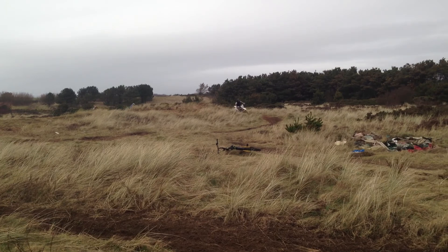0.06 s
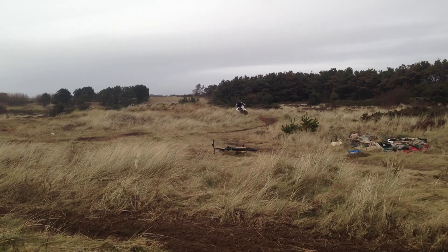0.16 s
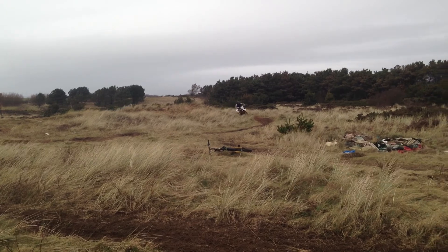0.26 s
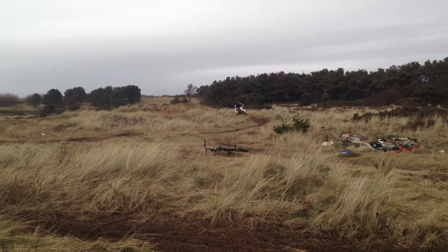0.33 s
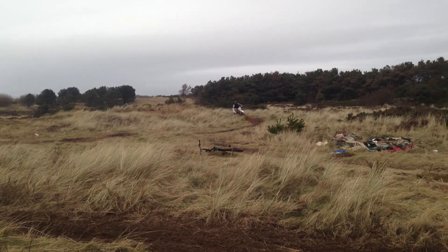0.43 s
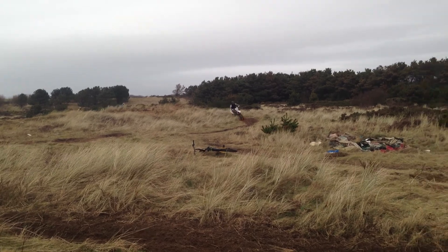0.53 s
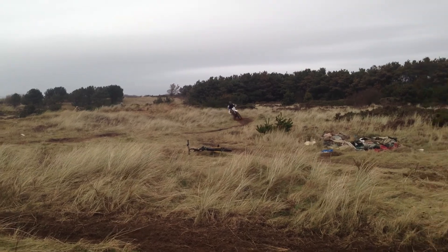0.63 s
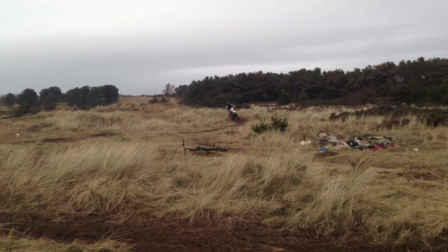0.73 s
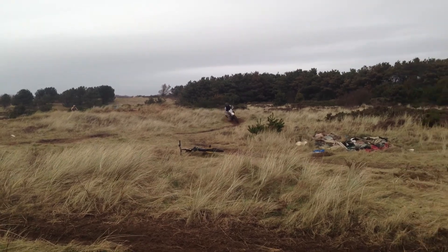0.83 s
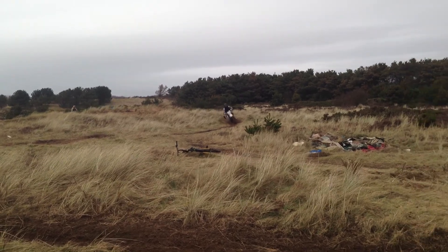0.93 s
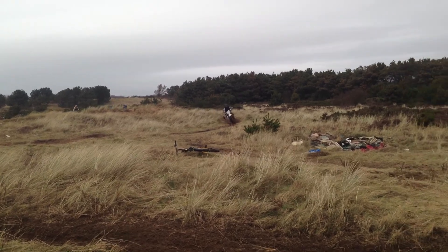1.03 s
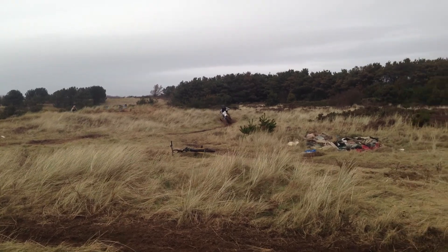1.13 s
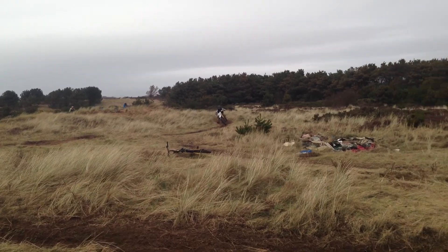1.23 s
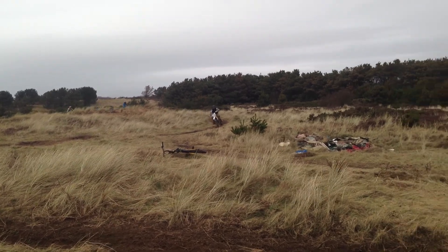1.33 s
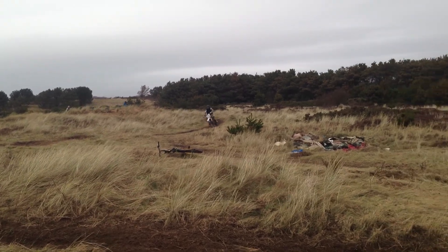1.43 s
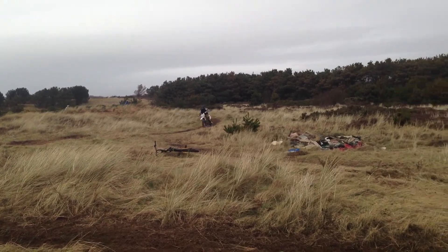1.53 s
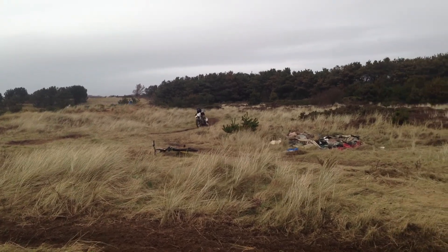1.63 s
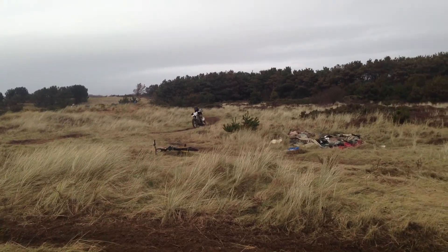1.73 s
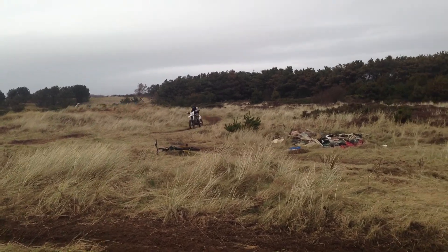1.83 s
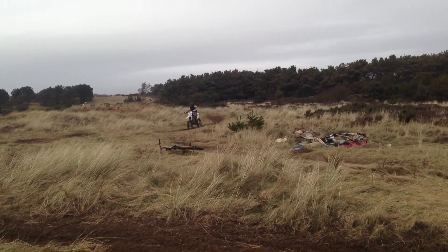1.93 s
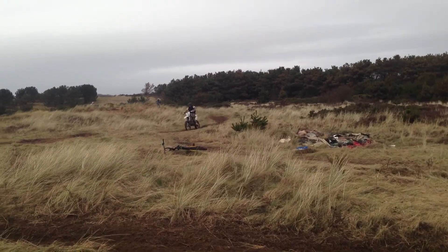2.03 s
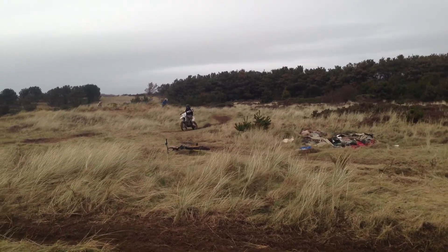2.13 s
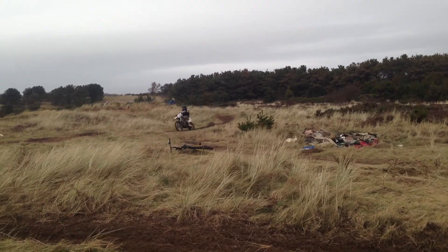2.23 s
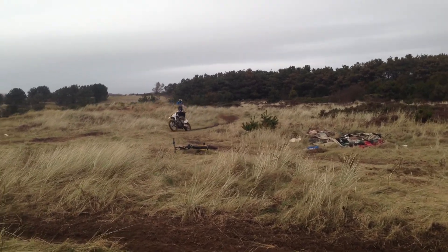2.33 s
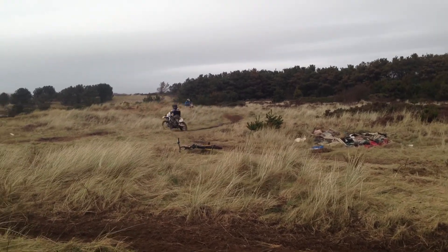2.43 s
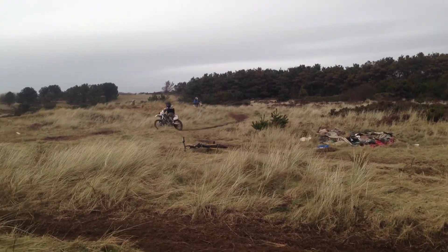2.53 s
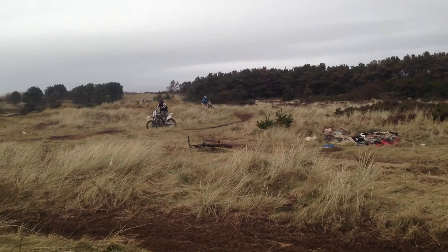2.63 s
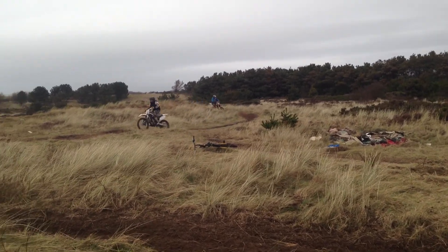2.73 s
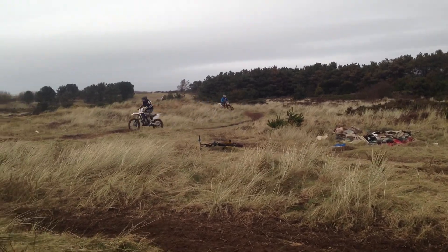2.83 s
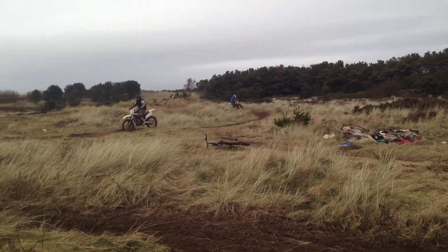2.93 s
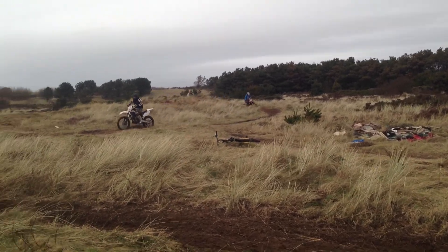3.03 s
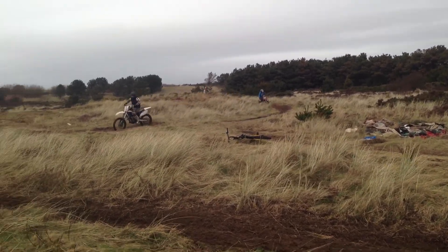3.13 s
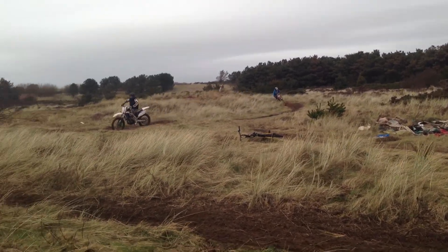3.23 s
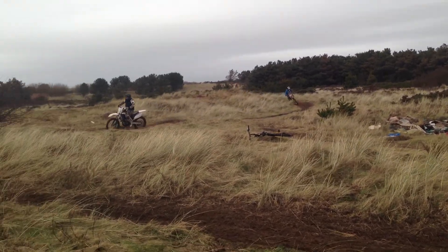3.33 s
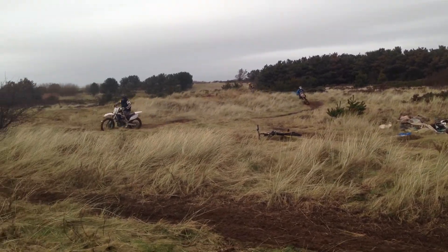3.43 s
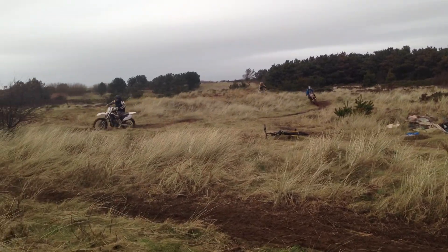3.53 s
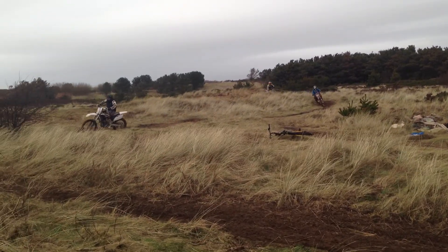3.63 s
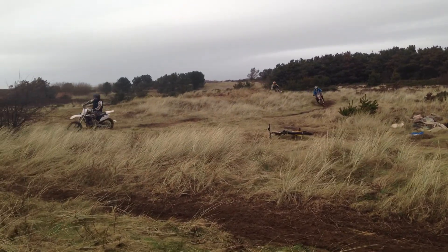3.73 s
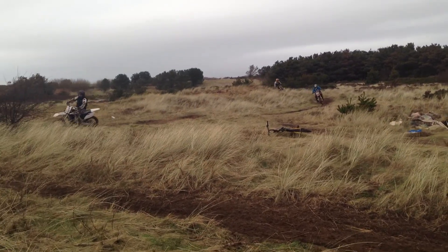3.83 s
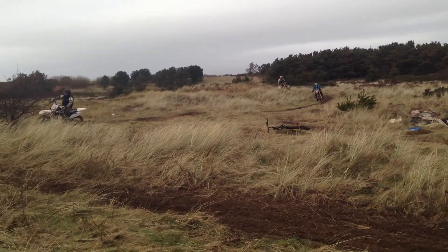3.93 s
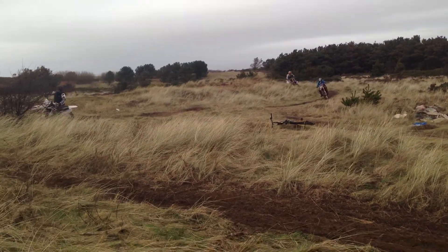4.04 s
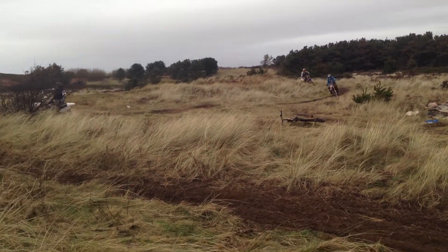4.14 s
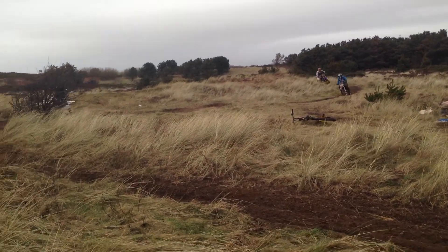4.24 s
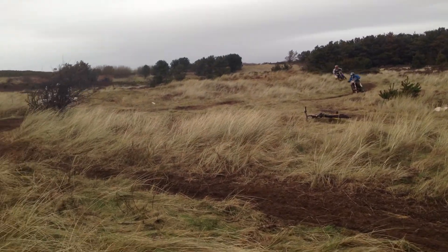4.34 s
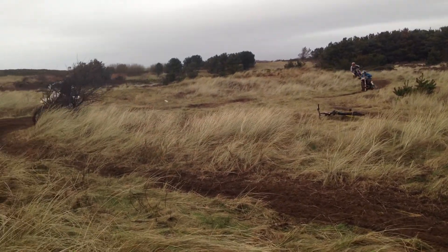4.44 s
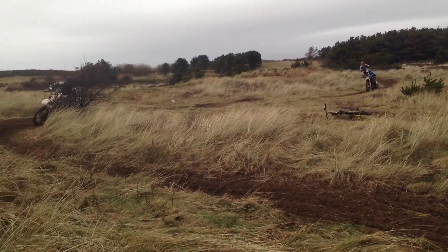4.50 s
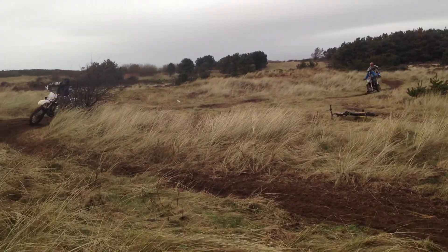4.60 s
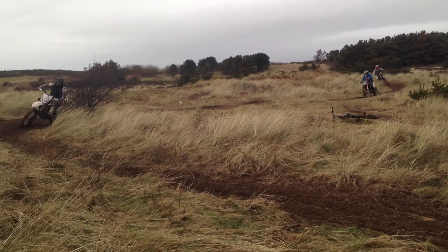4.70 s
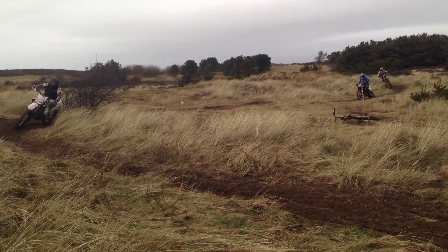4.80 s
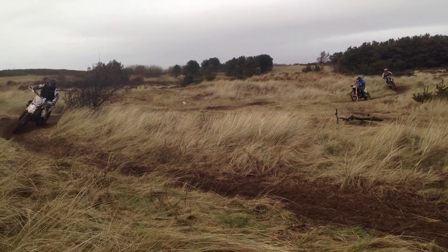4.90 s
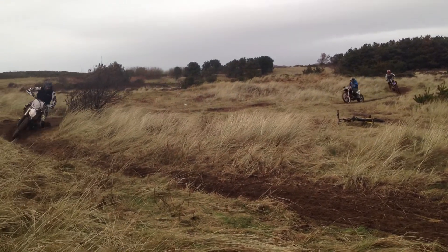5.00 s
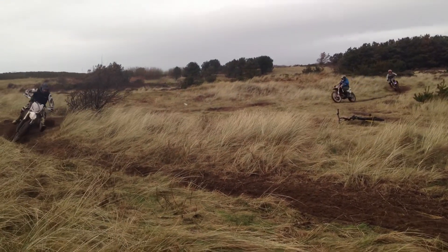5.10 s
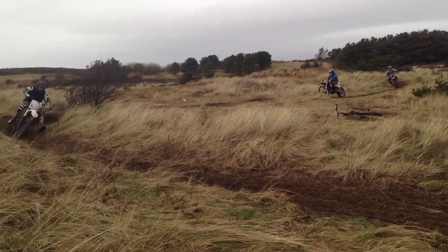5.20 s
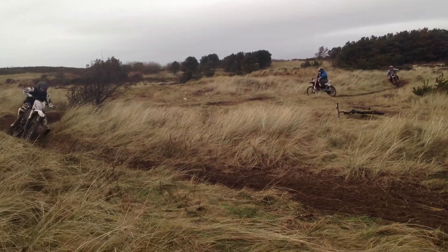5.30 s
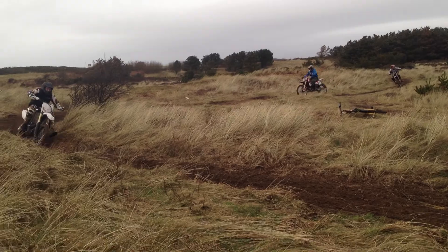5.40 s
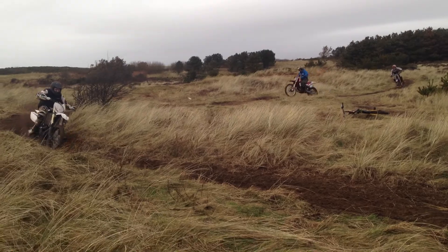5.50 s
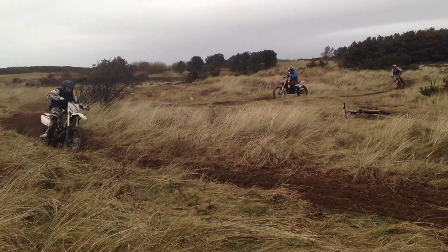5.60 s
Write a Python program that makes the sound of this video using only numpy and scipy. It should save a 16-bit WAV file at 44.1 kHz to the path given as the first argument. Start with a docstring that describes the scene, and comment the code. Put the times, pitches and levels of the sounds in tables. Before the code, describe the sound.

A dirt bike approaches over grassy dunes, droning and blipping its throttle, backfires sharply, then roars past close with a harsh, rasping burst.

```python
"""A single-cylinder four-stroke dirt bike arrives along a dune track, droning and clattering, its gears whining.
A second, duller bike revs farther up the track; noise gusts and knocks buffet the microphone over a steady
background noise, with dry ticks and two small exhaust pops. Blips of the throttle make each firing thump in the
pipe and crack; one loud backfire, a single steep pressure wave, ducks the recorder's gain. Close by the bike opens
up: rasping gas, steep cracks that ring the can, a boom of engine orders in the pipe, and a few singing overtones."""
import sys
import numpy as np
from scipy import signal
from scipy.fft import rfft, irfft, next_fast_len
from scipy.io import wavfile
from scipy.ndimage import uniform_filter1d, minimum_filter1d

SR = 44100
rng = np.random.default_rng(int(sys.argv[2]) if len(sys.argv) > 2 else 0)


def unload_wav(signal):
    """Save mono or channel-first audio to the path in sys.argv[1] as 16-bit WAV at rate SR, clipped to [-1, 1]."""
    wavfile.write(
        sys.argv[1],
        SR,
        np.round(np.clip(np.atleast_2d(signal).T, -1, 1) * 32767).astype(np.int16),
    )


N = 249606
TIME = np.arange(N) / SR  # seconds
IDLE_HZ = 31  # firings per second at idle

# Blips of the throttle on the way in. Each row: start in seconds, length in seconds, first firing rate in Hz,
# top firing rate in Hz, crack level in dB, thump level in dB.
BLIPS = [(0.609, 0.14, 44, 50.6, -24, -44), (0.99, 0.1, 50, 59, -38, -47), (1.53, 0.14, 52, 64, -37, -48),
         (1.919, 0.21, 40, 62, -30, -37), (2.408, 0.2, 50.5, 51.5, -33, -45),
         (3.26, 0.17, 38, 42, -56, -47), (3.68, 0.09, 44, 48, -42, -43), (4.2755, 0.14, 41, 41, -23.5, -42),
         (4.446, 0.07, 41, 41.5, -50, -42)]
# The last burst, where the rear wheel spins up, grips and spins again.
# Each row: time in seconds, firings per second.
BURST_SPEED = [(4.92, 25.3), (4.955, 55), (5.04, 67.2), (5.11, 63.5), (5.23, 67.8), (5.31, 67.5),
               (5.43, 87.9), (5.485, 84.7), (5.555, 65), (5.66, 78)]
# Mechanical noise before trim. Each row: time in seconds, engine clatter in dB, chain and tyre hiss in dB.
CLATTER_LEVELS = [(0.0, -58.5, -62.5), (0.1, -59, -60), (0.16, -54, -55), (0.27, -56, -54.5),
                  (0.32, -69, -59.5), (0.37, -56, -52.5), (0.42, -58, -64), (0.55, -65.5, -64),
                  (1.0, -58, -62.5), (1.4, -62.5, -71), (1.68, -49.5, -62), (2.08, -66, -48.5),
                  (2.25, -58, -52.5), (2.7, -60, -58.5), (3.1, -51, -55), (3.45, -55, -53.5),
                  (3.68, -55, -60), (3.8, -49, -52.5), (3.95, -51.5, -60), (4.2, -54.5, -59.5),
                  (4.55, -49.5, -53.5), (4.82, -51.5, -57.5), (5.0, -31.5, -39), (5.3, -31.5, -46),
                  (5.66, -36, -22)]
# Relative spectra of treble hiss, rushing gas and wind flutter. Each row: frequency in Hz, level in dB.
HISS_COLOUR = [(2000, 0), (4300, 2), (5600, -7.5), (6800, -4), (7700, 0.5), (8600, -13), (10000, -24),
               (14000, -37)]
RASP_COLOUR = [(100, -21), (300, 5), (400, -5), (490, -10.5), (680, 0.5), (890, -19), (1200, -2),
               (1900, 1.5), (2130, -5.5), (2400, 3), (2800, -1), (3300, 0.5), (4000, -12.5), (4350, -16),
               (4800, -20), (8000, -26), (15000, -65)]
GUST_COLOUR = [(30, -50), (150, 9), (270, 3.5), (380, -1), (620, 4), (800, -5.5), (1100, -15.5),
               (1800, -25), (4000, -62), (9000, -81)]


def gain_of(db):
    """Decibels to a factor."""
    return 10 ** (np.asarray(db) / 20)


def evened(x):
    """Scales to rms 1."""
    return x / np.sqrt(np.mean(x ** 2) + 1e-20)


def smoothed(x, size, second_size):
    """Two running means, sizes in samples."""
    return uniform_filter1d(uniform_filter1d(x, size), second_size)


def steadied(x, size=4400):
    """Scales to a running rms of 1."""
    return x / np.sqrt(abs(smoothed(x ** 2, size, size // 2)) + 1e-12)


def wander(size, second_size):
    """A slow random curve of rms 1."""
    return evened(smoothed(rng.standard_normal(N), size, second_size))


def curve(rows):
    """Each column of a table, joined by straight lines in time."""
    s, *columns = np.transpose(rows)
    return [np.interp(TIME, s, c) for c in columns]


def coloured(x, points, turn=0):
    """Filters by a spectrum; turn rotates all phases alike (radians)."""
    f, db = np.transpose(points)
    size = next_fast_len(len(x) + 4096)
    bins = np.fft.rfftfreq(size, 1 / SR)
    gain = gain_of(np.interp(np.log(bins + 1), np.log(f), db))
    return irfft(rfft(x, size) * gain * np.exp(1j * turn), size)[:len(x)]


def noise(points):
    """Noise of rms 1 with a given spectrum."""
    return evened(coloured(rng.standard_normal(N), points))


def impulses(times, sizes):
    """One impulse at each time."""
    return np.bincount(np.round(np.asarray(times) * SR).astype(int), sizes, N)[:N]


def uneven_firings(fired, uneven_db):
    """One impulse for each firing, of random strength."""
    return impulses(fired, gain_of(uneven_db * rng.standard_normal(len(fired))))


def firing_times(cycles):
    """The engine fires as each whole cycle completes (seconds)."""
    return TIME[1:][np.diff(np.floor(cycles)) > 0]


def shock(train, points, turn, size=512):
    """Turns each impulse into a short pressure spike of peak 1."""
    spike = coloured(signal.unit_impulse(2 * size + 1, size), points, turn)
    return signal.oaconvolve(train, spike / abs(spike).max(), "same")


def ring(x, modes):
    """Drives a set of damped resonances."""
    t = TIME[:SR // 10]
    response = sum(gain_of(db - 60 * t / t60) * np.sin(2 * np.pi * hz * t) for hz, db, t60 in modes)
    return signal.oaconvolve(x, response)[:N]


def resonate(x, hz, width):
    """A resonance that follows the curve hz: shift down to zero, smooth twice, shift back."""
    turn = np.exp(2j * np.pi * np.cumsum(hz) / SR)
    r = np.exp(-np.pi * width / SR)
    smooth = signal.lfilter([(1 - r) ** 2], [1, -2 * r, r * r], x / turn + 1e-18)
    return 2 * (turn * smooth).real


def scatter(x, wet_db, t60):
    """Weak sparse echoes off the dunes and the ground."""
    t = TIME[:SR // 3]
    present = rng.random(len(t)) < 2000 / SR  # 2000 echoes per second on average
    taps = rng.standard_normal(len(t)) * present * gain_of(-60 * t / t60) * (t > .002)
    return x + gain_of(wet_db) * signal.oaconvolve(x, taps / np.linalg.norm(taps))[:N]


def engine_speed():
    """Firings per second: each blip pulls the engine up, then it coasts down towards idle."""
    entry_hz, coast_s = 40.5, .27  # arrives coasting; time constant of each fall
    speed = IDLE_HZ + (entry_hz - IDLE_HZ) * np.exp(-TIME / coast_s)
    for start, length, first, top, _, _ in BLIPS:
        pulled = np.interp(TIME, [start, start + length], [first, top])
        shut_s = np.maximum(TIME - start - length, 0)
        coasted = IDLE_HZ + (pulled - IDLE_HZ) * np.exp(-shut_s / coast_s)
        speed = np.where(TIME < start, speed, coasted)
    return np.where(TIME < BURST_SPEED[0][0], speed, curve(BURST_SPEED)[0])


def engine_cycles(speed):
    """Counts the cycles; the engine catches with a firing each time the throttle opens."""
    cycles = np.cumsum(speed) / SR
    for start, *_ in [*BLIPS, BURST_SPEED[0]]:
        to_next_firing = -cycles[round(start * SR)] % 1
        cycles = cycles + (TIME >= start) * to_next_firing
    return cycles


def throttle():
    """Levels of crack and thump (dB): attack, hold and release for each blip, then the last burst."""
    # Throttle in the last burst: opened, eased and opened wide.
    # Each row: time in seconds, crack level in dB, thump level in dB.
    burst = [(4.82, -77, -44.5), (4.95, -18.5, -31), (5.04, -14.5, -39), (5.17, -12, -42), (5.23, -23, -36),
             (5.3, -22.5, -38), (5.37, -6, -31), (5.55, -1.5, -42), (5.66, -1, -22)]
    # Exhaust drone with the throttle shut, as the bike dips and turns among the dunes.
    # Each row: time in seconds, level in dB.
    drone_levels = [(0, -45.5), (0.28, -47), (0.5, -52), (0.88, -46.5), (1.05, -47.5), (1.7, -51),
                    (1.95, -50), (2.22, -44), (2.33, -49), (2.65, -42.5), (2.85, -40), (3.17, -47.5),
                    (3.6, -49), (4.3, -43), (4.52, -42), (4.63, -35.5), (4.8, -46)]
    attack_s = 0.088  # the crack's rise; the thump builds through the whole blip
    crack_fall_db_per_s, thump_fall_db_per_s = 244, 123
    shut_crack_db = -64  # faint crack with the throttle shut
    crack, thud = gain_of(curve(burst)) * (TIME > burst[0][0])
    for start, length, _, _, crack_db, thump_db in BLIPS:
        opened, filled = [np.sin(np.pi / 2 * np.clip((TIME - start) / rise_s, 0, 1)) ** 2
                          for rise_s in (attack_s, length)]
        shut_s = np.maximum(TIME - start - length, 0)
        crack = crack + opened * gain_of(crack_db - crack_fall_db_per_s * shut_s)
        thud = thud + filled * gain_of(thump_db - thump_fall_db_per_s * shut_s)
    crack = np.hypot(crack, gain_of(shut_crack_db))
    thud = np.hypot(thud, gain_of(curve(drone_levels)[0]))
    return 20 * np.log10([crack, thud])


def thump(fired, speed, load_db, thump_db, uneven_db=2.9, low_cut_hz=100, drone_width_hz=68):
    """With the throttle open every firing rings the pipe; with it shut the pipe drones raggedly."""
    # Low resonances of the exhaust. Each row: multiple of the main pitch, width in Hz, level in dB.
    pipe_modes = [(0.999, 85, 11.5), (1.6, 145, -8), (3.4, 380, -26)]
    rough = .05  # turbulent share of the gas flow
    idle_beat = .66  # share of the sound that still keeps the beat with the throttle shut
    # pitch at idle, and the power of engine speed it follows: hotter gas raises the pipe
    pipe_hz, pipe_rise = 140.5, 0.41
    # with the throttle shut the drone sinks with the engine
    drone_hz, drone_rise = 138.3, 0.42
    opening = np.clip(np.interp(load_db, [-42, -13], [idle_beat, 1]), 0, 1)
    beats = steadied(uneven_firings(fired, uneven_db))
    drive = (1 - rough) * beats + rough * rng.standard_normal(N)
    revs = speed / IDLE_HZ
    pitch = pipe_hz * revs ** pipe_rise
    main, *upper = [gain_of(db) * resonate(drive, ratio * pitch, width) for ratio, width, db in pipe_modes]
    drone = resonate(rng.standard_normal(N), drone_hz * revs ** drone_rise, drone_width_hz)
    beating = np.sin(opening * np.pi / 2) * steadied(main - sum(upper))
    pipe = beating + np.cos(opening * np.pi / 2) * steadied(drone)
    # the small outlet radiates little deep bass
    pipe = signal.sosfilt(signal.butter(4, low_cut_hz, "high", fs=SR, output="sos"), pipe)
    return gain_of(thump_db) * steadied(pipe)


def machinery(age, load_db, clatter_trim_db=7, hiss_trim_db=5, rasp_trim_db=6):
    """Valve gear, chain, tyres and rushing gas: noise that swells after each firing, most under load."""
    # Relative spectrum of the clatter. Each row: frequency in Hz, level in dB.
    clatter_colour = [(30, -57), (100, 6.5), (450, 3.5), (650, -4.5), (900, -6.5), (1400, -5.5),
                      (1900, -2.5), (2130, 1), (2400, -0.5), (3200, 2.5), (4200, -8.5), (5200, -26),
                      (8000, -14), (15000, -79)]
    # Gas rushing out in the near blip and the last burst. Each row: time in seconds, level before trim in dB.
    rasp_levels = [(4.25, -88), (4.33, -40), (4.42, -41.5), (4.5, -59), (4.8, -84), (4.9, -56),
                   (4.98, -29.5), (5.1, -24), (5.22, -28), (5.3, -29), (5.42, -20.5), (5.66, -21.5)]
    # Swell after each firing, in order: depth coasting, depth under load, decay in seconds.
    coasting_depth, load_depth, decay_s = (.7, 2.6, .003)
    clatter_db, hiss_db = curve(CLATTER_LEVELS)
    depth = np.interp(load_db, [-50, -38], [coasting_depth, load_depth])
    swell = steadied(1 + depth * np.exp(-age / decay_s))
    rattle = swell * rng.standard_normal((3, N))
    clatter = gain_of(clatter_db + clatter_trim_db) * coloured(rattle[0], clatter_colour)
    hiss = gain_of(hiss_db + hiss_trim_db) * coloured(rattle[1], HISS_COLOUR)
    rasp = gain_of(curve(rasp_levels)[0] + rasp_trim_db) * coloured(rattle[2], RASP_COLOUR)
    return drifting_echo(clatter + hiss) + rasp


def drifting_echo(x, size=6000):
    """Adds a weak ground echo whose path changes as the bike rides over the bumps: wavering bands."""
    share, delay_s, drift = .4, .0016, .2
    path_s = delay_s * np.exp(drift * wander(size, size))
    return (x + share * np.interp(TIME - path_s, TIME, x)) / np.hypot(1, share)


def gears(speed, load_db, loudest_db=-45):
    """Fuzzy whines of meshing teeth that follow the engine speed while the bike coasts."""
    # Gear whines. Each row: multiple of the firing rate, width in Hz, level in dB.
    whines = [(49.1, 58, -23), (63.5, 52, -13.5), (77, 130, -15.5)]
    whine = sum(gain_of(db) * evened(resonate(rng.standard_normal(N), order * speed, width))
                for order, width, db in whines)
    coasting = np.interp(load_db, [-50, -42], [1, 0])
    return coasting * gain_of(np.minimum(curve(CLATTER_LEVELS)[0], loudest_db)) * whine


def wavering(depth_db=1.46, size=2600):
    """A gain that drifts at random, so the noise flickers."""
    return gain_of(depth_db * wander(size, size))


def wind(edge_s=0.0058, lumpy_db=2, background_db=-55.5):
    """Short lumpy gusts of noise on the microphone over a steady background noise."""
    # Wind gusts before trim.
    # Each row: start in seconds, length in seconds, flutter level in dB, low buffet level in dB.
    gust_rows = [(0.832, 0.027, -45, -43), (0.869, 0.043, -51.5, -47), (1.069, 0.029, -49.5, -53),
                 (1.132, 0.035, -33.5, -37), (1.175, 0.036, -37, -39), (1.224, 0.18, -44.5, -53),
                 (1.281, 0.02, -45, -49), (1.413, 0.045, -35, -38), (1.46, 0.09, -49.5, -48),
                 (1.553, 0.016, -37.5, -35), (1.58, 0.031, -38, -33), (1.626, 0.014, -28.5, -50),
                 (1.651, 0.129, -42, -46.5), (1.68, 0.062, -43.5, -41), (1.805, 0.17, -48.5, -53),
                 (2.916, 0.048, -51.5, -51), (3.044, 0.048, -43, -49), (3.238, 0.16, -55, -53)]
    # Relative spectra of the low buffet and the background noise. Each row: frequency in Hz, level in dB.
    buffet_colour = [(20, -51), (60, -33), (120, 1.5), (200, -7.5), (300, -15), (600, -79), (2000, -86)]
    background_colour = [(20, -44), (70, 11), (160, 6.5), (350, -4), (600, 2), (1000, -7.5), (3000, -13),
                         (9000, -22), (15000, -26)]
    flutter, buffet = np.zeros((2, N))
    for s, length, flutter_db, buffet_db in gust_rows:
        window = (np.tanh((TIME - s) / edge_s) - np.tanh((TIME - s - length) / edge_s)) / 2
        flutter += gain_of(flutter_db) * window
        buffet += gain_of(buffet_db) * window
    lumps = evened(gain_of(lumpy_db * wander(300, 100)))
    gusts = gain_of(2.5) * flutter * noise(GUST_COLOUR) + gain_of(4) * buffet * noise(buffet_colour)
    return lumps * gusts + gain_of(background_db) * noise(background_colour)


def follower(uneven_db=1.5):
    """The second bike: a duller train of firings, softened by the dunes between."""
    # The second bike's revs. Each row: time in seconds, firings per second, level in dB.
    revs = [(0.0, 70, -95), (0.35, 66, -61), (0.55, 86, -49), (0.75, 87, -54), (0.95, 80, -46),
            (1.2, 82, -48.5), (3.15, 62, -50), (3.42, 67.6, -48.5), (3.62, 70.5, -42.5), (3.76, 68.6, -52),
            (3.88, 69, -49.5), (4.03, 84, -42.5), (4.2, 72, -50), (4.36, 84, -39), (4.44, 102, -39.5),
            (4.5, 108, -38), (4.57, 86, -35), (4.63, 83, -42), (4.72, 75, -48.5), (4.8, 77, -53),
            (5.0, 96, -47)]
    # Its relative spectrum. Each row: frequency in Hz, level in dB.
    far_colour = [(70, -21), (140, 11), (210, 6.5), (260, -1.5), (320, -14.5), (430, -11), (530, -9),
                  (630, -17.5), (740, -12), (950, -20.5), (1400, -27.5), (3000, -26), (6000, -63)]
    speed, level_db = curve(revs)
    fired = firing_times(np.cumsum(speed) / SR)
    beats = coloured(uneven_firings(fired, uneven_db), far_colour)
    return gain_of(level_db) * steadied(scatter(beats, wet_db=-9, t60=0.039))


def cracks(fired, age, wait, load_db, uneven_db=1.2, puff_db=-9, fizz_db=-21, spit_s=0.00074):
    """Under load each firing leaves as a pressure spike that rings the can, inside a puff of noise."""
    # Rings of the silencer can after each crack. Each row: frequency in Hz, level in dB, t60 in seconds.
    can_modes = [(795, -35, 0.014), (1350, -27, 0.0027), (1880, -19, 0.0057)]
    # Relative spectrum of the spike. Each row: frequency in Hz, level in dB.
    crack_colour = [(300, -23), (650, 9.5), (900, -55), (1150, 8.5), (1800, 14.5), (2130, 14.5),
                    (2400, 4.5), (3300, 8.5), (4000, -3.5), (5000, -25), (7700, -85), (10000, -128),
                    (15000, -80)]
    # The silencer's chambers cancel narrow bands. Each row: frequency in Hz, level in dB.
    chambers = [(380, -9), (490, -9), (600, -1.5), (770, -5), (885, -30), (1030, 2.5), (2000, 3),
                (2130, -13), (2280, 2), (3700, 3), (4020, -14), (4330, 10), (4700, -30), (5100, 4),
                (5500, -7)]
    # How the can's rings reach the microphone as the bike turns, and the spit once the outlet points this way.
    # Each row: time in seconds, lower ring in dB, upper ring in dB, spit of treble in dB.
    facing_levels = [(4.4, 1, -33, -30), (4.95, 16, -7, -30), (5.07, -1, 6.5, -28), (5.18, -17, -27, -34),
                     (5.32, 1, -23, -28), (5.43, 11.5, -18, -23), (5.53, 6.5, -13, -8), (5.66, 1, -8, -7)]
    # Relative spectrum of the spit. Each row: frequency in Hz, level in dB.
    spit_colour = [(3000, -5), (5000, 2), (6500, 2), (7700, 0), (9000, -14), (11000, -21.5), (15000, -34)]
    # Near echoes of each crack off the ground, in order: level in dB, t60 in seconds.
    echo_db, echo_t60 = (-13, .03)
    puff_s, lead_s = .003, .0025  # time constants of the noise after and before each crack
    *facing_db, spit_db = curve(facing_levels)
    strength_db = np.interp(fired, TIME, load_db) + uneven_db * rng.standard_normal(len(fired))
    train = impulses(fired, gain_of(strength_db))
    spikes = gain_of(2.5) * shock(train, crack_colour, turn=0.39)
    bark = ring(train, can_modes) - spikes + singing(fired, strength_db, facing_db)
    # the outlet radiates no deep bass, and the highest treble of each crack is rolled off
    band = signal.butter(2, [120, 10000], "band", fs=SR, output="sos")
    bark = signal.sosfiltfilt(band, coloured(bark, chambers))
    # noise swells briefly before each crack and dies away after it
    swell = gain_of(load_db) * (np.exp(-age / puff_s) + np.exp(-wait / lead_s))
    puff = swell * rng.standard_normal((2, N))
    puffs = gain_of(puff_db) * coloured(puff[0], RASP_COLOUR) + gain_of(fizz_db) * coloured(puff[1], HISS_COLOUR)
    # a hiss of treble with each crack
    spit = gain_of(load_db + spit_db) * np.exp(-age / spit_s) * rng.standard_normal(N)
    # a light throttle gives soft putts, a wide one steep cracks
    steep = np.interp(load_db, [-22, -13], [0, 1])
    outlet = steep * scatter(bark, echo_db, echo_t60) + (1 - steep) * putts(train, age, load_db)
    return outlet + puffs + coloured(spit, spit_colour)


def putts(train, age, load_db, putt_db=22, tail_db=-23, tail_s=0.0079):
    """Soft putts of a light throttle, each with its own ragged tail; far off, the lightest are the dullest."""
    # Relative spectra by the way the bike faces: far off and very light, far off, and passing side-on.
    # Each row: frequency in Hz, level in dB.
    dull_colour = [(150, -24), (300, -16), (420, 4), (620, 7), (800, 1), (950, -6), (1200, -5.5),
                   (1600, -3.5), (1950, -5), (2200, -27), (4000, -30), (8000, -47), (14000, -60)]
    far_colour = [(150, -36), (300, -32), (450, -11), (700, 0), (950, -9.5), (1200, -5), (1600, -1),
                  (2100, -3), (2400, -21), (3100, -33), (3600, -14), (4300, -12.5), (4800, -20),
                  (6000, -37), (8000, -36), (14000, -60)]
    near_colour = [(150, -20), (300, 5), (450, -5.5), (700, 0.5), (900, -11), (1200, 4.5), (2300, -5),
                   (2700, -17), (3250, -11), (3700, -27), (4000, -38), (4700, -31), (5500, -35),
                   (7000, -24), (9000, -45), (14000, -55)]
    # Start and end of the change from far off to side-on, in seconds.
    turning_s = (2.8, 4.1)
    tail = gain_of(load_db + tail_db) * np.exp(-age / tail_s) * rng.standard_normal(N)
    drive = train + tail
    near = np.interp(TIME, turning_s, [0, 1])
    bright = np.interp(load_db, [-34, -29], [0, 1])
    far = drive * (1 - near)
    far_sound = coloured(far * (1 - bright), dull_colour) + coloured(far * bright, far_colour)
    return -gain_of(putt_db) * (far_sound + coloured(drive * near, near_colour))


def singing(fired, strength_db, facing_db, detune=0.042):
    """The can's two strongest rings; each ring's pitch is varied a little at random at each firing."""
    # The two strongest rings. Each row: frequency in Hz, level in dB, t60 in seconds.
    can_rings = [(2357, -11.5, 0.012), (3260, -4, 0.016)]
    last = np.maximum(np.searchsorted(fired, TIME, "right") - 1, 0)
    since = abs(TIME - fired[last])
    tunings = 1 + detune * rng.standard_normal((len(fired), len(can_rings)))
    out = np.zeros(N)
    for (hz, db, t60), facing, tuning in zip(can_rings, facing_db, tunings.T):
        level_db = strength_db[last] + facing + db - 60 * since / t60
        out += gain_of(level_db) * np.sin(2 * np.pi * hz * tuning[last] * since)
    return out


def bumps():
    """Single dull knocks on the microphone among the gusts, each a short pressure spike."""
    # Dull knocks. Each row: time in seconds, peak in dB.
    knocks = [(0.624, -28.5), (1.187, -18.5), (1.446, -25), (1.822, -25)]
    s, db = np.transpose(knocks)
    return shock(impulses(s, gain_of(db)), GUST_COLOUR, turn=np.pi)


def ticks_and_pops(decay_s=0.00014):
    """Dry ticks and two small exhaust pops: sine bursts a few cycles long or less, with sparse echoes."""
    # Ticks, and the pops at 2.413 and 4.625 s.
    # Each row: time in seconds, envelope peak in dB, centre frequency in Hz.
    tick_rows = [(1.240, -35, 3705), (1.314, -35.5, 3870), (1.388, -40, 4150), (1.825, -27.5, 3750),
                 (1.879, -40, 3388), (2.413, -16, 2600), (3.062, -16.5, 3600), (4.079, -27.5, 3080),
                 (4.625, -21, 1790)]
    out, t = np.zeros(N), TIME[:SR // 100]
    envelope = t / decay_s * np.exp(1 - t / decay_s)
    for s, db, hz in tick_rows:
        burst = envelope * np.sin(2 * np.pi * hz * t)
        out += signal.oaconvolve(impulses([s], [gain_of(db)]), burst)[:N]
    return scatter(out, wet_db=-12.0, t60=0.06)


def backfires():
    """Unburnt fuel goes off loudly in the pipe as one steep, dry pressure wave."""
    # Loud backfires on a closed throttle. Each row: time in seconds, peak before echoes in dB.
    bangs = [(2.138, 1.5)]
    # Relative spectrum of the bang. Each row: frequency in Hz, level in dB.
    bang_colour = [(150, -31), (380, -11.5), (600, 9.5), (1000, 2.5), (1600, 1.5), (2300, 0.5),
                   (2800, -8.5), (3600, -4), (4700, -18), (5300, -14.5), (6400, -31), (8000, -29),
                   (14000, -58)]
    s, db = np.transpose(bangs)
    bang = shock(impulses(s, gain_of(db)), bang_colour, turn=-1.4)
    return scatter(bang, wet_db=-14, t60=.02)


def boom(cycles, speed, lag=0.305):
    """Close by the exhaust booms in clean engine orders, swelling as they glide through the pipe's resonances."""
    # Boom in the last burst. Each row: time in seconds, level in dB, lift of the lower resonance in dB,
    # lift of the upper resonance in dB.
    boom_levels = [(4.92, -60, 2, 7), (4.94, -38.5, 3, 9.5), (5.0, -29.5, 8, -4.5), (5.09, -29, 8.5, -7),
                   (5.14, -31.5, 6.5, 7), (5.23, -36.5, -7, 3.5), (5.32, -36.5, -11, 6.5),
                   (5.365, -26, 0, 12.5), (5.42, -29.5, 12, 7), (5.52, -26.5, -2, 1.5), (5.6, -25.5, 6, -8),
                   (5.66, -28, 11, -5)]
    # Those two resonances of the pipe. Each row: centre in Hz, distance in Hz at which the lift falls to 1/e.
    peaks = [(195, 26), (268, 32)]
    # Strength of an order by where it falls. Each row: frequency in Hz, level in dB.
    order_colour = [(60, -31), (130, -1.5), (165, 4), (200, 0.5), (260, 1), (325, -5.5), (400, -16.5),
                    (460, -17.5), (540, -16.5), (620, -15.5), (700, -15), (790, -21), (900, -37),
                    (1100, -16)]
    level_db, *lifts_db = curve(boom_levels)
    f, colour_db = np.transpose(order_colour)
    out = np.zeros(N)
    for order in range(1, 15):
        hz = order * speed
        db = level_db + np.interp(np.log(hz), np.log(f), colour_db)
        for lift, (centre, width) in zip(lifts_db, peaks):
            db += lift * np.exp(-((hz - centre) / width) ** 2)
        phase = 2 * np.pi * order * cycles - lag * order ** 2  # the pipe smears each pulse
        out += gain_of(db) * np.sqrt(2) * np.sin(phase)
    return out * (TIME > boom_levels[0][0])


def overtones(cycles):
    """Clean overtones that sing out of the last burst and arch with the engine speed."""
    # Single overtones. Each row: multiple of the firing rate, relative level in dB.
    orders = [(8, -3), (9, -9), (13, 0)]
    # Their shared level, highest as the revs climb. Each row: time in seconds, level in dB.
    overtone_levels = [(5.0, -120), (5.32, -60), (5.38, -38), (5.46, -38), (5.52, -48), (5.66, -50)]
    tones = sum(gain_of(db) * np.sqrt(2) * np.sin(2 * np.pi * order * cycles) for order, db in orders)
    return gain_of(curve(overtone_levels)[0]) * tones


def scene():
    """The engine fires once in each cycle, and its beating noises keep that time; the rest is added."""
    speed = engine_speed()
    load_db, thump_db = throttle()
    cycles = engine_cycles(speed)
    fired = firing_times(cycles)
    age, wait = cycles % 1 / speed, -cycles % 1 / speed  # seconds since the last firing and until the next
    exhaust = thump(fired, speed, load_db, thump_db) + cracks(fired, age, wait, load_db)
    exhaust += boom(cycles, speed) + overtones(cycles)
    works = wavering() * (machinery(age, load_db) + gears(speed, load_db))
    return (exhaust + works + wind() + follower() + bumps() + ticks_and_pops() + backfires())[None]


def record(dry, ceiling_db=-3, recover_db_per_s=2, edge_hz=15400):
    """A peak limiter that drops at once and recovers slowly; then the band limit."""
    peak_db = 20 * np.log10(abs(dry[0]) + 1e-9)
    fall = TIME * recover_db_per_s
    held_db = np.maximum.accumulate(peak_db + fall) - fall
    over_db = np.maximum(held_db - ceiling_db, 0)
    gain = uniform_filter1d(minimum_filter1d(gain_of(-over_db), size=89), size=89)
    low_pass = signal.firwin(511, edge_hz, window=("kaiser", 9), fs=SR)
    return signal.oaconvolve(dry * gain, low_pass[None], "same")


dry = scene()
out = record(dry)
unload_wav(out)
```